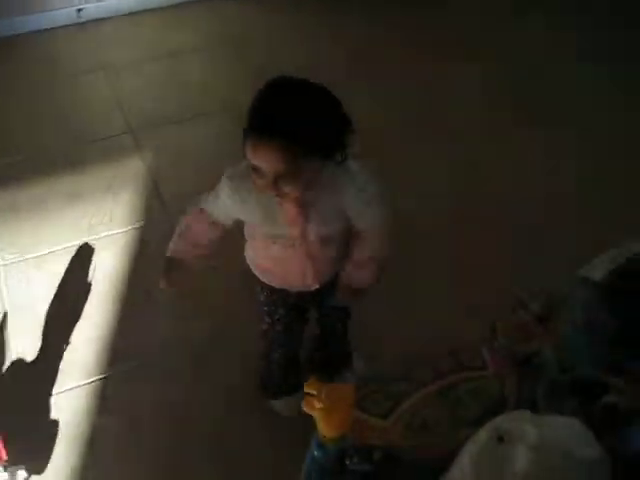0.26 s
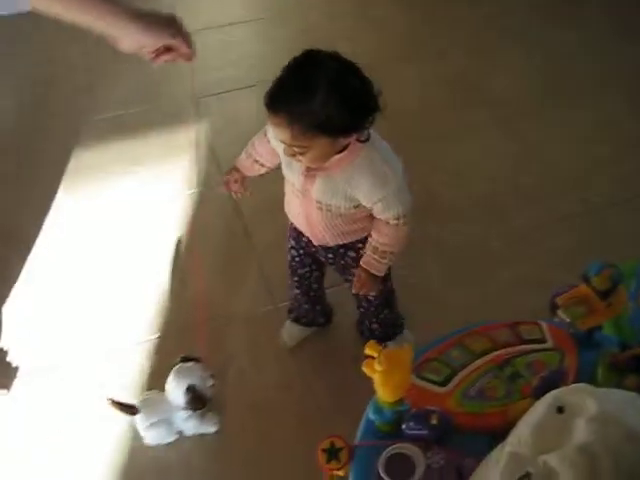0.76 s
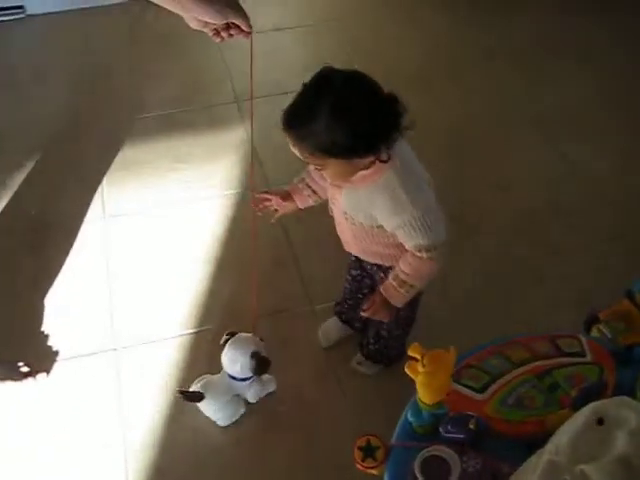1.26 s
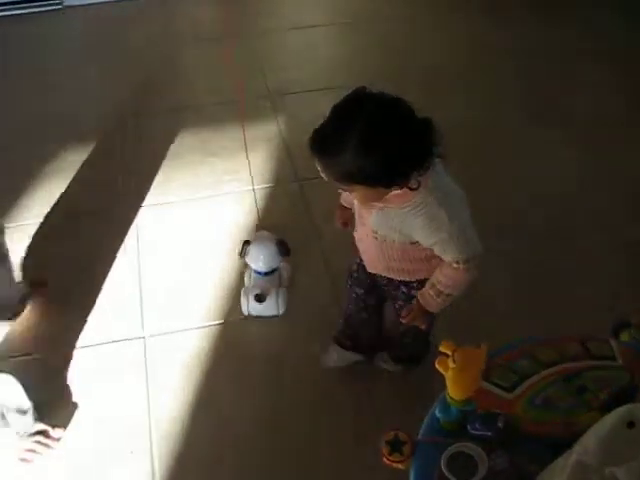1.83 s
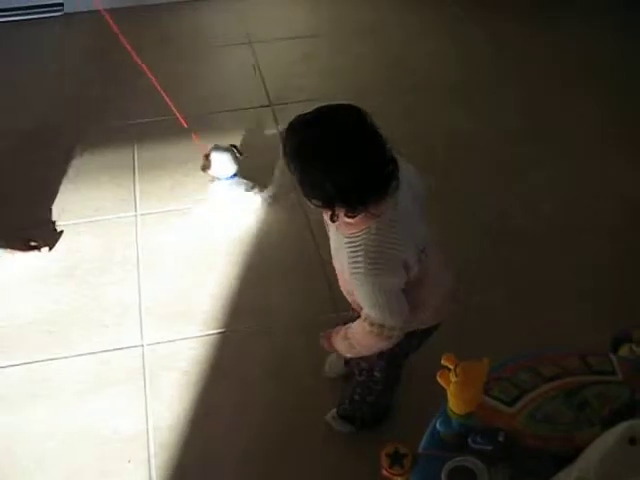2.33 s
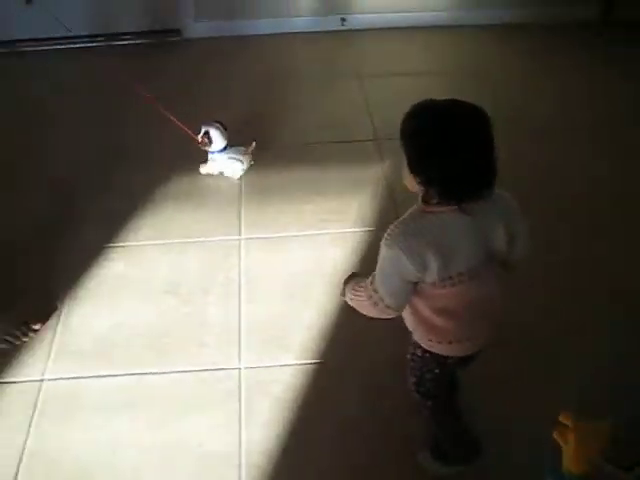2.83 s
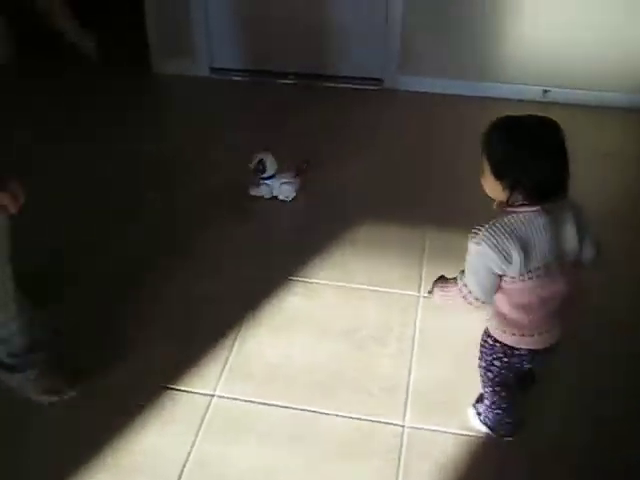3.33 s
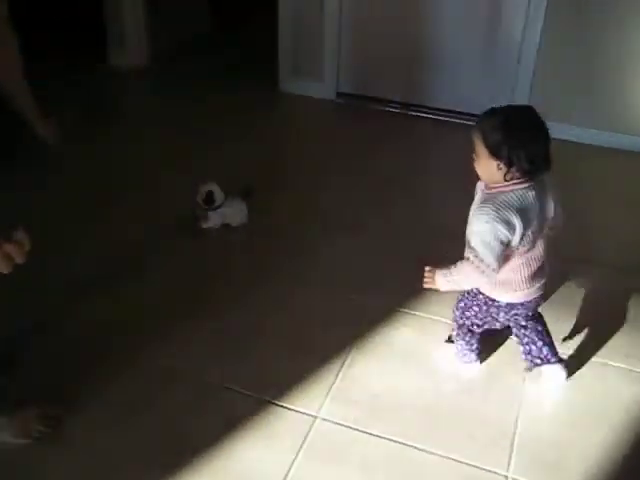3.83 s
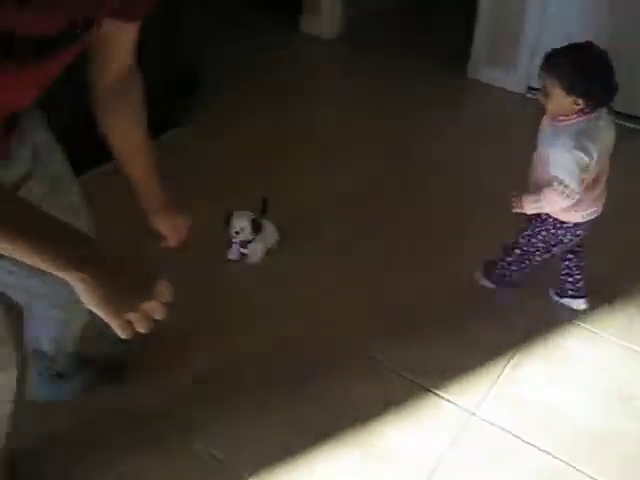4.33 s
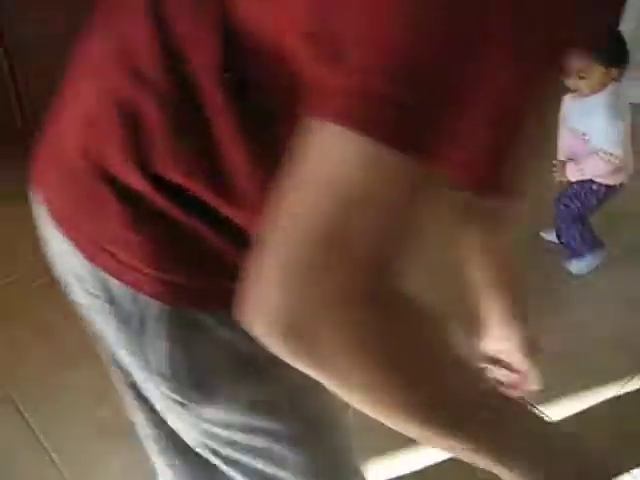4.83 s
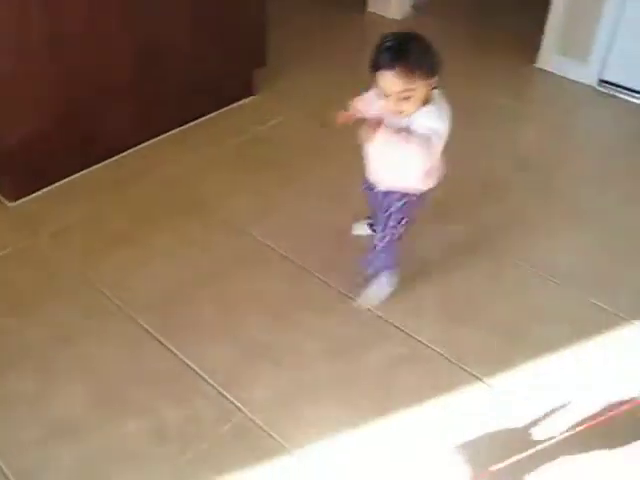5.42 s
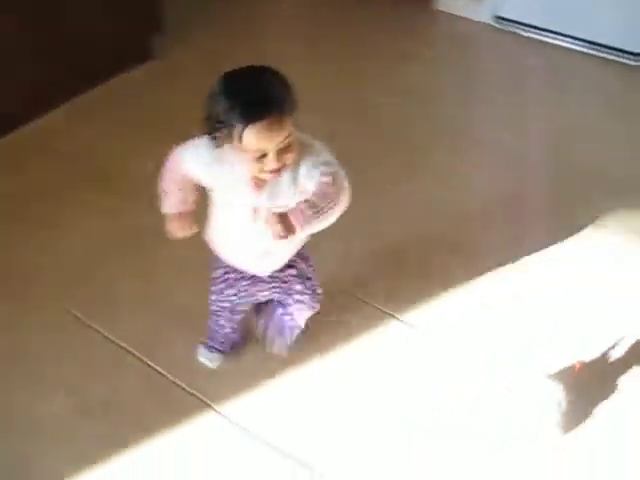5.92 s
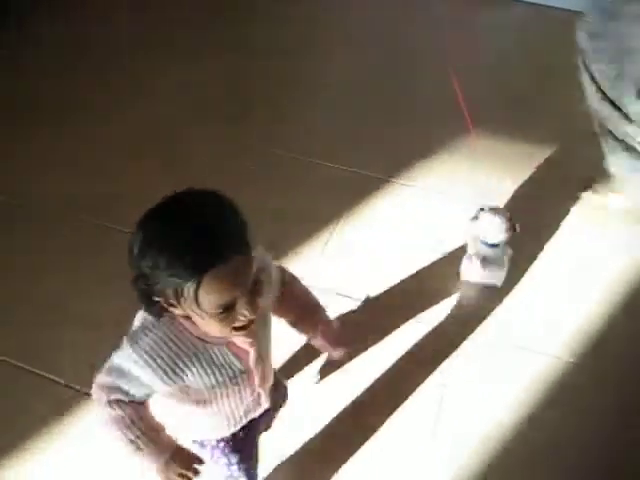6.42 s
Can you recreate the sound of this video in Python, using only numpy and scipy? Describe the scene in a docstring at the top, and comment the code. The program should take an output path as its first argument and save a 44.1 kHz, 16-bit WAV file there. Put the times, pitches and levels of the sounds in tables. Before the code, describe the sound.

Plastic gears grind and hollow feet clatter across a tiled floor, pausing near the start, then marching steadily with ticks, skids and tiny metallic tinkles.

```python
"""A battery toy puppy walks over the tiles of a bare, echoing room: its plastic gears rasp and scrape, and
each stride thumps the hollow shell, snaps a leg and shakes a spring. Within a second it stalls, with only faint
creaks and ticks, then walks on. A bell, a band of short rings, joins in after two seconds. Skids (bursts of
grit), ticks (cracks of noise) and squeaks (wavering tones) come now and then. Near the end its feet briefly
slide and the drumming drops. Quiet air and a faint whine run throughout; one microphone hears it all."""
import sys
import numpy as np
from scipy import signal
from scipy.io import wavfile
from scipy.ndimage import uniform_filter1d

SR = 44100
rng = np.random.default_rng(int(sys.argv[2]) if len(sys.argv) > 2 else 0)


def store_pcm(level_fs):
    """Save levels as 16-bit WAV."""
    pcm = np.round(np.clip(level_fs, -1, 1) * 32767).astype(np.int16)
    wavfile.write(sys.argv[1], SR, np.atleast_2d(pcm).T)


N = 293706
TIME = np.arange(N) / SR  # seconds

# Tone colour of the gear rasp: (frequency [Hz], relative level [dB per Hz])
RASP_COLOUR = [(30, -57), (120, -35), (300, -23), (600, -13), (1050, -6), (1400, -6), (1750, -3.5),
               (2300, 1), (2850, 1.5), (3400, -1.5), (4000, -1), (5000, -5.5), (6500, -8.5), (9000, -18.5),
               (15000, -49)]
# Tone colour of the fine scraping: (frequency [Hz], relative level [dB per Hz])
SCRAPE_COLOUR = [(60, -61), (500, -13), (3000, 1), (5000, 8.5), (6500, 9.5), (8500, 6), (10500, 3),
                 (12500, -3), (14000, -7), (15500, -19)]
# The scraping flares into a brief hiss: (time [s], level [dB])
SCUFFS = [(0.535, -29.5), (1.67, -27.5), (1.925, -29), (3.26, -28), (3.61, -32), (3.67, -28.5), (4.48, -26),
          (4.52, -36), (4.8, -33), (4.94, -29), (5.81, -26), (6.255, -27)]


def gears():
    """Plastic teeth rasp and chirp in the gearbox, with a fine scraping on top; the room thickens both."""
    teeth = in_room(contacts(per_s=2000, spread_db=2.5, flutter_db=3.0, flutter_s=0.01), wet_db=-4.5)
    slips = chirps(per_s=110, width_s=0.0011, low_hz=2073, high_hz=3740)

    rasp_drive = amp(-1.0) * drive(fall_db_per_s=56)
    rasp_jolts = amp(-21.0) * jolts(rise_s=0.0044, fall_db_per_s=60)
    rasp = colour(teeth, RASP_COLOUR) + amp(-8.5) * slips
    rasp *= np.hypot(rasp_drive, rasp_jolts)

    scrape_drive = amp(-13.5) * drive(fall_db_per_s=66)
    scrape_jolts = amp(-24.0) * jolts(rise_s=0.006, fall_db_per_s=106)
    flares = sum(amp(db) * swell(s, s, rise_s=0.02, fall_db_per_s=170) for s, db in SCUFFS)
    scrape_level = np.hypot(np.hypot(scrape_drive, scrape_jolts), flares)
    scrape = colour(teeth, SCRAPE_COLOUR) * scrape_level

    _, gears_gain = gliding()
    return (rasp + scrape) * gears_gain


def chirps(per_s, width_s, low_hz, high_hz, spread_db=3, count=24):
    """Single teeth stick and slip: brief chirps that start fast and die away, each tooth at its own pitch."""
    t = np.arange(1200) / SR
    out = np.zeros(N)
    force = amp(spread_db * np.minimum(rng.exponential(1, N), 3)) * (rng.random(N) < per_s / SR)
    tooth = rng.integers(0, count, N)
    for k, hz in enumerate(np.geomspace(low_hz, high_hz, count)):
        chirp = np.sin(2 * np.pi * hz * t) * t * np.exp(-t / width_s)
        out += signal.oaconvolve(force * (tooth == k), chirp)[:N]
    return unit(out)


# Spells in which the motor drives the gears: (start [s], end [s], relative level [dB])
RUNS = [(0.0, 0.2, -26), (0.374, 0.563, -22.5), (1.25, 1.467, -45.5), (1.697, 2.317, -24.5),
        (2.364, 6.66, -20.5)]
SPIN_UP_S = 0.067


def drive(fall_db_per_s):
    """Effort of the motor: it spins up, its load changes most in mid-stride, and it runs down."""
    s, *_, load_db = np.transpose(STRIDES)
    # counts strides: the whole part is the stride number, the rest is how far through it we are
    stride = np.interp(TIME, np.append(s, TIME[-1]), np.arange(len(s) + 1))
    stride_load_db = load_db[np.minimum(stride.astype(int), len(s) - 1)]
    push_db = abs(np.sin(np.pi * stride)) * stride_load_db
    spells = [amp(db) * swell(start, end, SPIN_UP_S, fall_db_per_s) for start, end, db in RUNS]
    return np.max(spells, axis=0) * amp(push_db)


def jolts(rise_s, fall_db_per_s):
    """Each footfall shakes the loose parts as hard as it thumps, and the shaking dies away."""
    shakes = [amp(thump_db) * swell(s + rise_s, s + rise_s, rise_s, fall_db_per_s)
              for s, thump_db, *_ in STRIDES]
    return np.max(shakes, axis=0)


# The feet slide without stepping: (start [s], end [s], change of the body [dB], change of the gears [dB])
GLIDE = (6.39, 6.5, -16, -3.5)


def gliding():
    """Gains of the body and of the gears: both drop while the feet slide."""
    start, end, body_db, gears_db = GLIDE
    sliding = swell(start, end, rise_s=0.012, fall_db_per_s=400)
    return amp(body_db * sliding), amp(gears_db * sliding)


# Tone colour of the hollow body: (frequency [Hz], relative level [dB per Hz])
BODY_COLOUR = [(30, -56), (90, -37.5), (135, -49), (170, -28), (300, -26.5), (430, -23), (540, -16),
               (625, -3), (720, -4), (850, -5.5), (1050, -12.5), (1400, -13.5), (2200, -17.5), (6000, -73)]


def body(follow=0.59):
    """The hollow body drums as the feet judder over the tiles, hardest after each footfall."""
    judder = in_room(contacts(per_s=220, spread_db=1.0, flutter_db=2.0, flutter_s=0.018), wet_db=-3.5)
    motor_shake = amp(-19.0) * drive(fall_db_per_s=74) ** follow  # below 1: evens out the motor's effort
    foot_shake = amp(-23.0) * jolts(rise_s=0.008, fall_db_per_s=37)
    body_gain, _ = gliding()
    return colour(judder, BODY_COLOUR) * np.hypot(motor_shake, foot_shake) * body_gain


# Low ringing tones (modes) of the hollow shell:
# (frequency [Hz], relative level [dB], time to fall by 60 dB [s])
SHELL_MODES = [(526, -6, 0.0095), (657, -0.5, 0.029), (767, -1.5, 0.01), (1202, 4, 0.0034),
               (1448, 4, 0.006)]
# Modes of the hard plastic legs: (frequency [Hz], relative level [dB], time to fall by 60 dB [s])
LEG_MODES = [(2350, -10, 0.015), (2648, -2.5, 0.017), (3430, -6, 0.0069), (3980, -4.5, 0.013),
             (5680, -4, 0.0055), (6240, -8, 0.0057), (6770, -20.5, 0.017)]
# Modes of the metal spring: (frequency [Hz], relative level [dB], time to fall by 60 dB [s])
SPRING_MODES = [(5500, 0, .035), (7200, -3, .025), (8450, -1, .025), (9330, 0, .02), (10550, 1, .02),
                (10880, 0, .025), (11700, 0, .022), (12400, -1, .016), (12870, -1, .025), (13280, -1, .02),
                (13950, -8, .012)]
# Strides: (time [s], relative level of shell thump [dB], of leg snap [dB], of spring [dB],
# extra gear load in the push that follows [dB])
STRIDES = [(0.003, -8, -14.5, -27, -2.5), (0.161, -6.5, -19, -25.5, -5), (0.331, -7, -18, -27, 1),
           (0.471, -15, -24, -41, -0.5), (0.574, -6.5, -14.5, -27.5, -4), (1.476, -8.5, -12, -28, 0),
           (1.767, -9, -18.5, -26.5, -1.5), (2.006, -9, -16.5, -25, -1.5), (2.198, -8, -22, -25.5, 3),
           (2.332, -8.5, -22, -28.5, 2), (2.504, -13, -22, -26, 0.5), (2.68, -11, -15.5, -26.5, 0),
           (2.852, -13, -19, -28, 0.5), (3.061, -8, -21, -29.5, 0), (3.22, -13, -18, -26.5, 1.5),
           (3.371, -14, -17, -28, 1.5), (3.529, -16.5, -22, -35, 1.5), (3.77, -13, -21, -32, 0.5),
           (3.917, -13, -23, -30, 2.5), (4.052, -10, -15, -33, 1), (4.239, -12.5, -20, -29.5, 0),
           (4.397, -12, -20, -30, 0), (4.566, -15.5, -26, -30, 0), (4.733, -8, -27, -26.5, -1),
           (4.886, -7.5, -31, -28, -1), (5.054, -13, -29, -33, 1), (5.256, -10.5, -17, -28.5, 0.5),
           (5.445, -10, -18, -27.5, -1.5), (5.661, -9.5, -19, -26.5, -4), (5.866, -12, -21, -25, -1),
           (6.075, -7, -16, -25, -1), (6.301, -10.5, -18, -28, -0.5), (6.553, -10.5, -23, -27, -1.5)]


def strides(lowest_hz=450):
    """Each foot thumps the shell, the leg snaps home and rebounds, and the spring inside buzzes."""
    thumps, legs, buzz = np.zeros((3, N))
    for s, thump_db, snap_db, spring_db, _ in STRIDES:
        thump = ring(SHELL_MODES, scatter_db=2.0, detune=0.015)
        add(thumps, s + 0.0005, amp(thump_db - 8.5) * crest(thump))

        leg = ring(LEG_MODES, scatter_db=1.5, detune=0.012)
        leg = signal.fftconvolve(leg, chatter(fade_s=0.0014, db=-4))
        add(legs, s + 0.0018, amp(snap_db - 2.0) * crest(leg))
        rebound_s = 0.0032 * rng.uniform(0.8, 1.2)
        add(legs, s + rebound_s, amp(snap_db - 1.5) * crest(leg))

        spring = ring(SPRING_MODES, scatter_db=2, detune=0.0054)
        spring = signal.fftconvolve(spring, chatter(fade_s=0.011, db=17))
        coils = snap(low_hz=7650, high_hz=12500, fade_s=0.0034)  # the coils slap each other
        add(buzz, s + 0.002, amp(spring_db - 0.5) * crest(spring))
        add(buzz, s + 0.0027, amp(spring_db - 11) * crest(coils))
    heard = in_room(thumps, wet_db=-2.0) + in_room(legs, wet_db=-6.5) + in_room(buzz, wet_db=-1.5)
    # a small shell gives off no bass
    radiation = signal.butter(3, lowest_hz, "high", fs=SR, output="sos")
    return signal.sosfilt(radiation, heard)


# Tone colour of a skid: (frequency [Hz], relative level [dB per Hz])
SKID_COLOUR = [(400, -29), (1500, -10), (3000, -11), (4200, 9.5), (6000, 5), (8000, -10), (11000, -16),
               (15000, -19)]
# Feet skidding on the glaze: (start [s], length [s], relative level [dB])
SKIDS = [(0.364, 0.016, -25), (1.661, 0.053, -31), (1.907, 0.02, -25), (2.985, 0.015, -37),
         (3.268, .06, -27), (3.422, .04, -34), (3.637, 0.067, -25.5), (5.142, 0.14, -34),
         (5.434, .025, -25), (5.8, 0.064, -27.5), (6.165, 0.015, -21), (6.235, 0.044, -27),
         (6.345, 0.11, -23.5), (6.495, 0.041, -27.5)]


def skids():
    """A foot slips: a burst of fine grit that lasts as long as the slide."""
    grit = colour(contacts(per_s=3900, spread_db=4.0, flutter_db=3.0, flutter_s=0.0059), SKID_COLOUR)
    slip = np.zeros(N)
    for s, length_s, db in SKIDS:
        count = max(int(length_s * SR), 100)
        add(slip, s, amp(db) * signal.windows.tukey(count, 0.5))
    return in_room(grit * slip, wet_db=-7.5)


# Sharp plastic ticks: (time [s], level [dB])
TICKS = [(0.1246, -23.5), (0.4715, -20), (0.699, -30.5), (0.996, -37.5), (2.9861, -33), (3.6194, -27),
         (3.647, -24), (4.029, -21), (4.6997, -19.5), (4.86, -21), (5.1427, -25), (5.1936, -29),
         (5.3503, -25), (5.553, -14.5)]
# Gear teeth catching: (time [s], level [dB])
CATCHES = [(0.298, -21.5), (0.46, -26), (0.702, -24), (0.940, -30.5), (0.998, -31), (1.177, -38),
           (1.707, -17), (1.735, -20.5), (1.872, -22), (1.927, -15), (2.753, -12), (2.992, -15.5),
           (4.53, -16), (5.32, -19), (5.633, -16.5), (5.708, -15.5), (5.850, -21), (5.956, -20),
           (6.178, -18), (6.456, -20)]


def ticks():
    """Bright ticks of loose plastic, and the duller snap of a tooth that catches."""
    bright, dull = np.zeros((2, N))
    for s, db in TICKS:
        tick = snap(low_hz=3480, high_hz=10500, fade_s=0.0018)
        add(bright, s, amp(db) * crest(tick))
    for s, db in CATCHES:
        catch = snap(low_hz=2130, high_hz=3760, fade_s=0.006)
        add(dull, s - 0.001, amp(db) * crest(catch))
    return in_room(bright, wet_db=-2) + in_room(dull, wet_db=-11.5)


# Modes of the bell: (frequency [Hz], relative level [dB], time to fall by 60 dB [s])
BELL_MODES = [(6950, 0, .04), (7150, -1, .025), (8020, -2, .03), (8300, 1, .025), (9330, -10, .035),
              (10600, -11, .03), (11700, -15, .03)]
# Bell strikes: (time [s], relative level [dB])
TINKLES = [(2.320, -17), (3.515, -20), (3.789, -21), (3.912, -21.5), (4.183, -19.5), (4.388, -19),
           (4.792, -24.5), (5.030, -19.5)]


def bell():
    """A pellet rattles in a small slotted bell: a ring with a jangle of tiny impacts."""
    out = np.zeros(N)
    for s, db in TINKLES:
        tinkle = ring(BELL_MODES, scatter_db=1.5, detune=0.0058)
        tinkle = signal.fftconvolve(tinkle, chatter(fade_s=0.0076, db=25))
        jangle = snap(low_hz=6550, high_hz=9300, fade_s=0.015)
        add(out, s - 0.002, amp(db - 5.0) * crest(tinkle))
        add(out, s - 0.002, amp(db - 7.5) * crest(jangle))
    return in_room(out, wet_db=-1)


# Axle squeaks: (start [s], end [s], pitch [Hz], level [dB], pitch waver [share of the pitch])
SQUEAKS = [(0.456, 0.512, 3030, -27, 0.043), (1.216, 1.345, 2880, -42, 0.026),
           (1.31, 1.45, 2850, -46.5, 0.012), (2.73, 2.768, 2710, -23, 0.042),
           (5.16, 5.285, 2890, -27, 0.037), (5.846, 5.877, 2720, -24, .04), (6.138, 6.205, 2340, -27, 0.04),
           (6.365, 6.461, 2975, -21.5, 0.1)]


def axle(overtone_db=-18, judder_db=2.5):
    """Stick and slip on a dry axle: an unsteady whistle with a weak upper mode."""
    out = np.zeros(N)
    for start, end, hz, db, waver in SQUEAKS:
        count = max(int((end - start) * SR), 300)
        drift, grip = (unit(uniform_filter1d(v, size=120))[:count] for v in rng.standard_normal((2, SR)))
        phase = 2 * np.pi * np.cumsum(hz * (1 + waver * drift)) / SR
        upper = np.sin(1.87 * phase)
        whistle = (np.sin(phase) + amp(overtone_db) * upper) * amp(judder_db * grip)
        add(out, start, amp(db) * unit(whistle * signal.windows.tukey(count, 0.3)))
    return in_room(out, wet_db=-11)


# Tone colour of the quiet room air: (frequency [Hz], relative level [dB per Hz])
HUSH_COLOUR = [(20, -1), (60, 2.5), (110, 4), (200, 7), (400, 9), (1000, 0), (3000, -22), (8000, -6),
               (13000, -8.5), (15500, -11)]


def hush():
    """Quiet room air, made of coloured noise, and a faint, unsteady electronic whine."""
    drift = unit(uniform_filter1d(rng.standard_normal(N), size=600))
    whine_hz = 15140 + 25 * drift
    whine = amp(-70) * np.sin(2 * np.pi * np.cumsum(whine_hz) / SR)
    air = amp(-53.0) * colour(rng.standard_normal(N), HUSH_COLOUR)
    return air + whine


# How long the room rings: (frequency [Hz], time to fall by 60 dB [s])
ROOM = [(150, 0.91), (600, 1.3), (2500, 1.56), (4500, 1.84), (7000, 0.78), (10000, 0.56), (15000, 0.066)]


def echo(x, count=60000):
    """Diffuse echo of the hard room, energy 1; the highest treble dies first."""
    taps = rng.standard_normal(count) * (rng.random(count) < 4000 / SR)  # 4000 reflections a second
    hz, t, z = signal.stft(taps, SR, nperseg=256)
    fade = np.exp(-np.log(1000) * t / read(ROOM, hz)[:, None])
    build_up = np.minimum(t / 0.0028, 1)
    tail = signal.istft(z * fade * build_up, SR, nperseg=256)[1]
    return signal.fftconvolve(x, tail / np.linalg.norm(tail))[:N]


def in_room(x, wet_db, count=3):
    """Direct sound plus echo; the blend of echo patterns changes as the toy moves on."""
    places = [np.cos(np.pi * (TIME * 1.283 + k / count)) * np.sqrt(2 / count) for k in range(count)]
    return x + amp(wet_db) * sum(echo(x * place) for place in places)


def contacts(per_s, spread_db, flutter_db, flutter_s):
    """A dense train of small contacts of uneven force that come in clumps."""
    force = amp(spread_db * np.minimum(rng.exponential(1, N), 3)) * rng.choice([-1, 1], N)
    train = force * (rng.random(N) < per_s / SR)
    knots = np.arange(int(N / SR / flutter_s) + 2) * flutter_s
    load = np.interp(TIME, knots, rng.uniform(-1.46, 1.53, len(knots)))
    return unit(train * amp(flutter_db * load))


def ring(modes, scatter_db, detune, count=6000):
    """One blow on a set of modes; the point of impact shifts their balance, and pitches vary a little."""
    hz, db, t60 = np.transpose(modes)[:, :, None]
    t = np.arange(count) / SR
    strength, shift = rng.standard_normal((2, len(hz), 1))
    side = (-1) ** np.arange(len(hz))[:, None]  # neighbouring modes start in opposite directions
    waves = side * np.sin(2 * np.pi * hz * (1 + detune * shift) * t)
    fade = np.exp(-np.log(1000) * t / t60)
    return (amp(db + scatter_db * strength) * fade * waves).sum(0)


def chatter(fade_s, db, count=4000):
    """A first contact, then a dying flurry of tiny rebounds."""
    flurry = rng.standard_normal(count) * np.exp(-np.arange(count) / SR / fade_s)
    flurry *= amp(db) / np.linalg.norm(flurry)
    flurry[0] = 1
    return flurry


def snap(low_hz, high_hz, fade_s):
    """A brief crack: a flurry of rebounds kept within one band."""
    band = signal.butter(2, [low_hz, min(high_hz, SR / 2 - 1)], "band", fs=SR, output="sos")
    return signal.sosfilt(band, chatter(fade_s, db=39))


def swell(start, end, rise_s, fall_db_per_s):
    """A gain that rises to 1 by start, holds until end and then dies away."""
    rise = np.clip(1 + (TIME - start) / rise_s, 0, 1)
    return rise * amp(-fall_db_per_s * np.maximum(TIME - end, 0))


def colour(x, spectrum, size=4096):
    """Gives a sound a tone colour at rms 1; the filter is causal, so each click rings after it lands."""
    log_gain = np.log(amp(read(spectrum, abs(np.fft.fftfreq(size, 1 / SR)))))
    # minimum phase: the filter's energy comes as early as it can
    taps = np.fft.ifft(np.exp(np.conj(signal.hilbert(log_gain)))).real
    return unit(signal.oaconvolve(x, taps[:size // 2])[:N])


def read(points, hz):
    """Reads a table on a log-frequency axis."""
    f, value = np.transpose(points)
    return np.interp(np.log(hz + 1), np.log(f + 1), value)


def amp(db):
    """Decibels to gain."""
    return 10 ** (np.asarray(db) / 20)


def unit(x):
    """Scales to rms 1."""
    return x / np.sqrt(np.mean(x ** 2) + 1e-20)


def crest(x, size=130):
    """Scales a blow so that its loudest three milliseconds or so have rms 1."""
    return x / np.sqrt(uniform_filter1d(x ** 2, size).max())


def add(mix, s, sound):
    """Mixes a sound in at time s."""
    part = mix[max(round(s * SR), 0):][:len(sound)]
    part += sound[:len(part)]


def scene():
    """All sources reach one microphone, heard alike in both channels."""
    mono = gears() + body() + strides() + skids() + ticks() + bell() + axle() + hush()
    return np.array([mono, mono])


def record(dry, edge_hz=15700):
    """The recorder's band limit: a steep cut of everything above the edge."""
    low_pass = signal.firwin(511, edge_hz, window=("kaiser", 9), fs=SR)
    return signal.oaconvolve(dry, low_pass[None], "same")


dry = scene()
out = record(dry)
store_pcm(out)
```